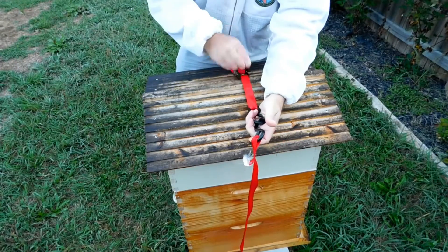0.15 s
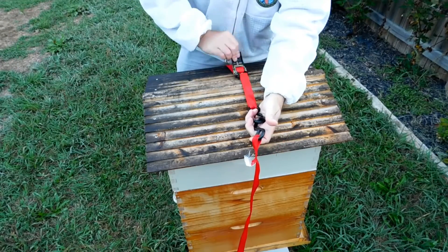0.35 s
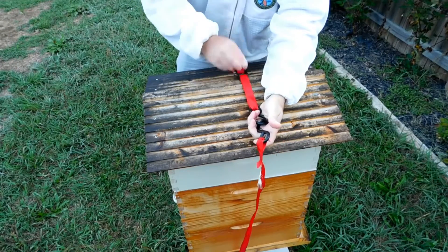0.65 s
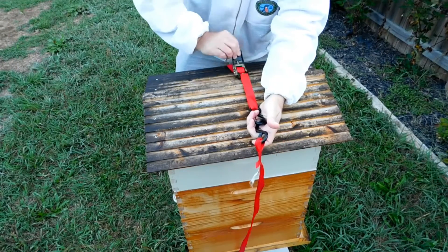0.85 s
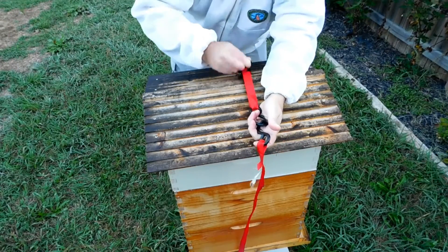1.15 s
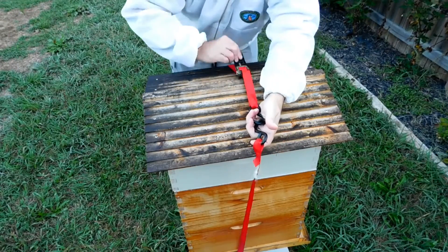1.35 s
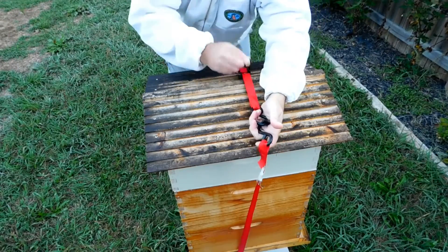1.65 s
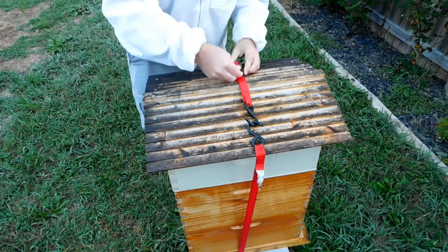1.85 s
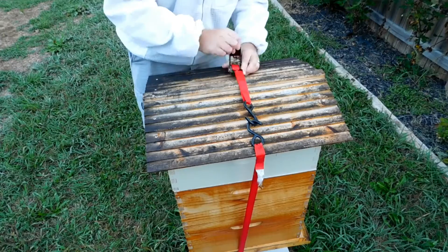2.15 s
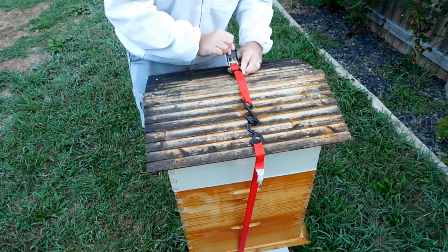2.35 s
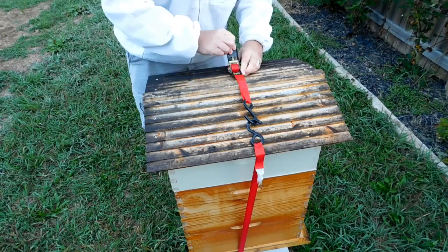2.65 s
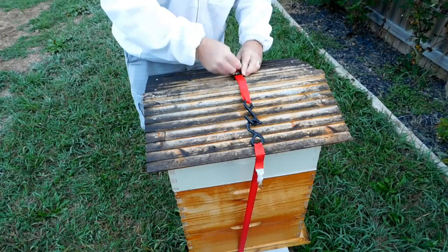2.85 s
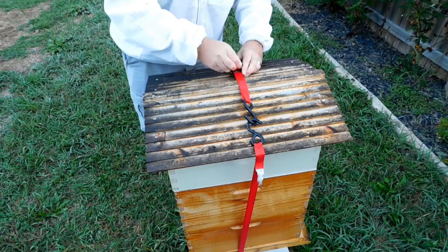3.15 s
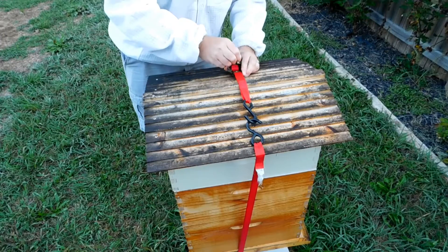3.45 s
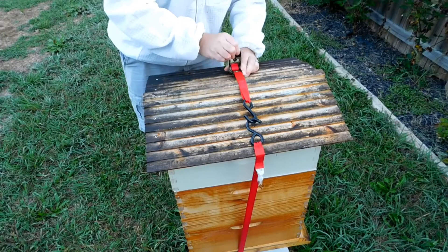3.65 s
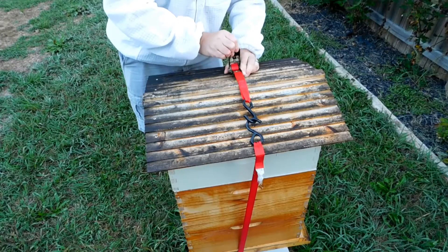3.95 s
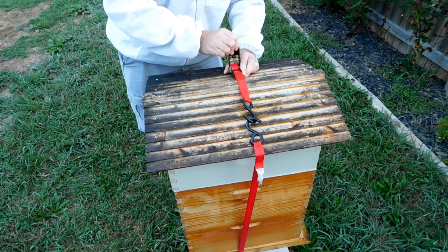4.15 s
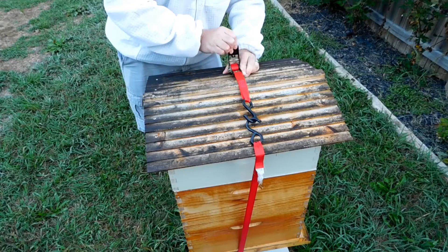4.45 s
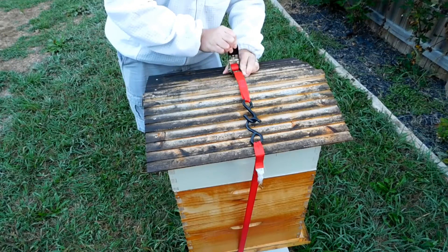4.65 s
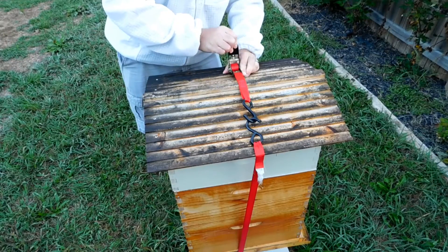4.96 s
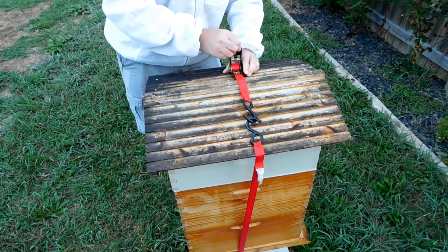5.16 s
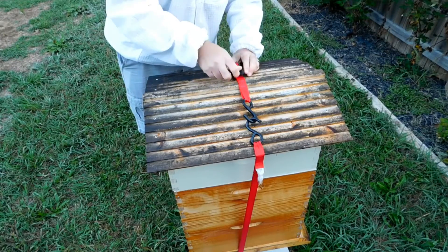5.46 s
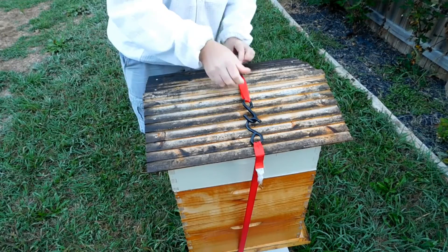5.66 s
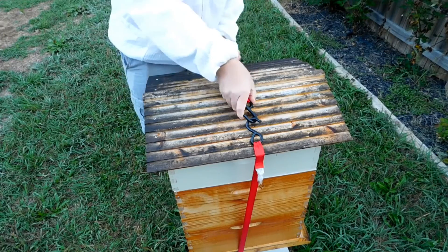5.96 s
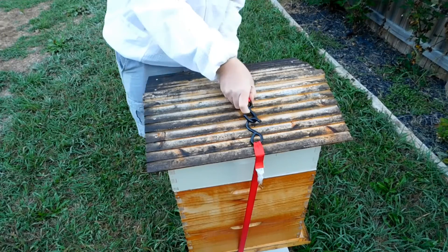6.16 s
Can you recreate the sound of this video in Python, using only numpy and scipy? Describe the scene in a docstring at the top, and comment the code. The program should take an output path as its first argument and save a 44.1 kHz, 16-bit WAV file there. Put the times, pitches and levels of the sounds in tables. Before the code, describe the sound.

A ratchet strap is tightened over a wooden beehive lid in a garden, a step from a stereo microphone and slightly to the right. From the start until about 2 seconds, sharp, dry steel clicks come in quick, uneven groups of two or three, mixed with dull knocks on the lid and soft, low booms from the hollow boxes. Between 2 and 3.3 seconds the clicks loosen and weaken into ticks and light knocks, with two stronger snaps around 2.5. Webbing and sleeves rustle faintly. Single clicks fall at 3.8 and 4.9 seconds, with a very faint, high bird whistle at 4.1. Two firm clacks follow at 5.1 and 5.4, the second with a thin, faint ring from a hook. Small wooden knocks trail off until about 6.2 seconds. The impacts have only a very short outdoor reflection, and distant road noise hisses softly throughout.

```python
"""A ratchet strap is cranked tight over the wooden lid of a beehive, a step from a stereo microphone.
The pawl snaps over the teeth and the frame knocks on the lid; each impact excites damped modes of
steel and wood. The hollow boxes boom, webbing and sleeves rustle by friction, and a free hook rings once.
A fence reflects the blows and the garden scatters them, over distant road noise and one faint bird."""
import sys
import numpy as np
from scipy import signal
from scipy.fft import rfft, irfft, next_fast_len
from scipy.io import wavfile
from scipy.ndimage import uniform_filter1d

SR = 44100
rng = np.random.default_rng(int(sys.argv[2]) if len(sys.argv) > 2 else 0)


def wav_record(signal):
    """Record a signal, one row per channel, as 16-bit PCM in the file named by sys.argv[1]."""
    frames = np.transpose(np.atleast_2d(signal))
    bounded = np.clip(frames, -1, 1)
    # unit amplitude maps onto the largest positive 16-bit level
    quanta = np.round(bounded * 32767).astype(np.int16)
    wavfile.write(sys.argv[1], SR, quanta)


N = 278712
SPAN = 4096  # samples in one blow

# The pawl snaps over a tooth: t/s, pawl level/dB, handle level/dB, lid level/dB, crack level/dB,
# favoured pawl f/Hz, favoured handle f/Hz, chatter time/ms
SNAPS = [(0.0631, -8.5, -24, -25, -11, 6000, 1700, 1.1), (0.1321, -8, -23, -18.5, -13, 6520, 1650, 0.84),
         (.1924, -16, -18, -21, -14, 5800, 2150, 1.4), (0.3488, -12, -16.5, -21.5, -11, 5930, 2040, 1),
         (.396, -9.5, -12, -19.5, -7.5, 5250, 1670, 0.79),
         (.4447, -18.5, -11, -20.5, -8.5, 5500, 1820, 1.25), (.604, -16, -17, -25, -11.5, 6100, 3340, 0.71),
         (0.6547, -8, -47, -24.5, -11.5, 6440, 1700, 0.72), (.702, -11, -38, -14.5, -28, 5900, 1740, 0.81),
         (.854, -16, -14.5, -22, -10.5, 5000, 2040, 1.4), (0.9018, -18, -17, -23.5, -8, 5280, 1710, 1.17),
         (1.1609, -14, -21, -17.5, -13, 4800, 1840, 1.22),
         (1.21, -15.5, -26.5, -24, -15.5, 6330, 1700, 1.15), (1.3764, -11.5, -11, -41, -7, 5060, 2200, 1.1),
         (1.4211, -41, -13.5, -27, -21, 5340, 2540, 2.3), (1.4272, -12.5, -13, -18, -6, 6660, 3050, 0.66),
         (1.48, -16, -16.5, -33, -17.5, 4530, 1660, 2.9), (1.6222, -14, -21.5, -33, -13.5, 7240, 1630, 1.3),
         (1.6639, -14.5, -19, -38, -13.5, 6560, 2120, 0.87), (1.711, -19, -17.5, -22, -15, 6230, 2360, 1.6),
         (1.8487, -5.5, -23, -23, -10, 5450, 1640, 0.74), (1.8801, -19, -24.5, -25.5, -19, 6460, 1920, 1.3),
         (1.957, -30, -30, -25.5, -23.5, 5840, 2900, 1.5), (2.2011, -23.5, -33, -35, -23, 5720, 1700, 0.54),
         (2.385, -45, -14.5, -48, -18.5, 5170, 2740, 3.8), (2.389, -9, -29, -23.5, -9, 6590, 3120, 0.37),
         (2.5586, -12.5, -17.5, -18.5, -9, 5100, 2850, 0.85),
         (2.823, -22.5, -43, -59, -32, 6670, 1700, 0.54), (2.9205, -23.5, -29, -31.5, -25, 7130, 1810, 1.4),
         (2.9965, -30, -49, -27, -24, 5100, 1700, 1.4), (3.8124, -18, -18.5, -27, -18, 6130, 2170, 1.02),
         (4.8974, -15.5, -17.5, -27, -9.5, 3800, 2840, 0.43),
         (5.137, -14, -8.5, -16, -23, 5470, 2190, 0.39), (5.426, -17, -15, -15.5, -7, 7120, 2450, 0.92)]


def undb(db):
    return 10 ** (np.asarray(db) / 20)


def at_rms(x, db):
    return x * undb(db) / np.sqrt(np.mean(x ** 2))


def at_peak(x, db):
    return x * undb(db) / abs(x).max()


def decay(t, t60):
    """Exponential damping: 60 dB down at t60."""
    return np.exp(-np.log(1000) * t / t60)


def band(x, lo_hz, hi_hz, order=2):
    """Butterworth band-pass."""
    sos = signal.butter(order, [lo_hz, min(hi_hz, .45 * SR)], "bandpass", fs=SR, output="sos")
    return signal.sosfilt(sos, x)


def wander(rate_hz):
    """Random steps smoothed twice; spread near 1."""
    k = int(SR / rate_hz)
    steps = np.repeat(rng.standard_normal(N // k + 1), k)
    return 1.43 * uniform_filter1d(uniform_filter1d(steps, k), k)[:N]


def delay(x, lag_s):
    """A linear phase shift delays by any fraction of a sample."""
    size = next_fast_len(N + SPAN)
    shift = np.exp(-2j * np.pi * np.fft.rfftfreq(size, 1 / SR) * lag_s)
    return irfft(rfft(x, size) * shift, size)[:N]


def road(db):
    """Distant tyre noise in flickering half-octave bands; coherence between channels falls with frequency."""
    # Tyre noise spectrum: f/Hz, relative spectral density level/dB
    spectrum = [(30, -20.5), (62, -9.5), (110, -22.5), (200, -12.5), (400, -10.5), (800, 2.5), (1250, 0.5),
                (2000, -14), (3200, -17), (6300, -26.5), (12000, -33), (16500, -46)]
    freqs, density_db = np.transpose(spectrum)
    out = 0
    for hz in 35 * 2 ** np.arange(0, 9, .5):
        mid, side = band(rng.standard_normal((2, N)), hz * 2 ** -.25, hz * 2 ** .22)
        coherence = np.clip(1.05 - .52 * np.log2(1 + hz / 900), 0, .95)
        pair = np.sqrt(1 + coherence) * mid + np.sqrt(1 - coherence) * side * np.array([[1], [-1]])
        band_db = np.interp(np.log(hz), np.log(freqs), density_db) + wander(rate_hz=4.84)
        out = out + undb(band_db) * pair
    return at_rms(out, 0) * undb(db)


def bird():
    """Thin far-off whistles: pure tones that waver by random frequency modulation."""
    # Whistles: t/s, duration/s, f/Hz, level/dB
    whistles = [(4.1, .08, 7540, -61), (4.12, 0.077, 6950, -66), (4.17, 0.044, 8100, -66)]
    t, out = np.arange(N) / SR, 0
    for start, length, hz, db in whistles:
        phase = 2 * np.pi * np.cumsum(hz * (1 + .03 * wander(rate_hz=400))) / SR
        envelope = np.sin(np.pi * np.clip((t - start) / length, 0, 1))
        out = out + undb(db) * envelope * np.sin(phase)
    return out


def garden(x, t60_s=.24, gain_db=-21.5):
    """Scattering from grass, boxes and boards leaves a short dull tail, different in each channel."""
    t = np.arange(SR // 3) / SR
    tails = rng.standard_normal((2, len(t))) * decay(t, t60_s) * np.minimum(t / .001, 1)
    tails = band(tails, 440, 5600, order=1)
    return undb(gain_db) * np.array([signal.fftconvolve(x, h / np.linalg.norm(h))[:N] for h in tails])


def fence(x, lag_s=.011, smear_s=.0005, gain_db=-12.5):
    """Reflection from uneven boards: one echo, smeared differently in each channel."""
    t = np.arange(256) / SR
    boards = rng.standard_normal((2, len(t))) * np.exp(-t / smear_s)
    echo = delay(band(x, 300, 14600, order=1), lag_s)
    return undb(gain_db) * np.array([np.convolve(echo, h / np.linalg.norm(h))[:N] for h in boards])


def rustle(db):
    """Friction of webbing and sleeves makes dense, uneven grains of noise."""
    grains = rng.standard_normal(N) * undb(2.5 * rng.exponential(size=N) + 2.5 * wander(rate_hz=20))
    return at_rms(band(grains, 2200, 7000, order=1), 0) * undb(db)


def thumps(re_crack_db=-26, width_s=.0012, tight_s=3.0, tight_db=-9):
    """Shock excitation: a snap jolts each capsule with its own low pulse, weaker once the strap is tight."""
    out, offsets = np.zeros((2, N)), np.arange(-256, 256)
    pulse = np.exp(-.5 * (offsets / SR / width_s) ** 2)
    for (start, _, _, _, crack_db, *_), jolt in zip(SNAPS, rng.standard_normal((len(SNAPS), 2, 1))):
        db = crack_db + re_crack_db + tight_db * (start > tight_s)
        out[:, int((start + .002) * SR) + offsets] += jolt * undb(db) * pulse
    return out


def hive(mode_hz=98.3, rise_s=.006, t60_s=.15):
    """Resonance: one low mode of the hollow boxes is pushed softly as a pull stroke bottoms out."""
    # Booms: t/s, level/dB
    booms = [(0.227, -35), (.705, -40), (0.744, -47), (1.161, -44), (1.245, -47), (1.492, -45),
             (1.752, -41), (1.798, -39.5)]
    out, t = np.zeros(N), np.arange(SR // 3) / SR
    boom = (1 - np.exp(-t / rise_s)) * decay(t, t60_s) * np.sin(2 * np.pi * mode_hz * t)
    for start, db in booms:
        i = int(start * SR)
        out[i:i + len(t)] += undb(db) * boom
    return out


def hook(start_s=5.428, centre_hz=13300, t60_s=.3, mode_db=-62):
    """Free vibration of a hook: thin, closely spaced modes beat as they decay."""
    t = np.maximum(np.arange(int((start_s + .5) * SR)) / SR - start_s, 0)
    hz = centre_hz * (1 + .016 * rng.standard_normal(30))
    tones = np.sin(2 * np.pi * (np.outer(hz, t) + rng.random((30, 1))))
    ringing = undb(mode_db) * tones.sum(axis=0) * decay(t, t60_s) * (t > 0)
    return np.pad(ringing, (0, N - len(t)))


def ring(force, modes, chance, peak_db, favoured_hz, focus_db, scatter_db=3, detune=.038):
    """Modal superposition: a force drives damped modes whose level and tuning vary from blow to blow."""
    t = np.arange(SPAN) / SR
    hz, t60 = np.transpose(modes)
    db = scatter_db * chance[:len(hz), 0]
    hz = hz * (1 + detune * chance[:len(hz), 1])
    if .85 * hz.min() < favoured_hz < 1.15 * hz.max():  # the grip favours one mode
        nearest = np.argmin(abs(np.log(hz / favoured_hz)))
        hz[nearest], db[nearest] = favoured_hz, focus_db
    response = undb(db) @ (np.sin(2 * np.pi * np.outer(hz, t)) * decay(t, t60[:, None]))
    return at_peak(signal.fftconvolve(force, response)[:SPAN], peak_db)


def blows(handle_hz=1836, lid_hz=855, knock_ms=.76, tick_ms=.86):
    """All impacts, in the columns of SNAPS with the favoured lid f/Hz added before the chatter time."""
    # The frame knocks on the lid: t/s, lid level/dB, handle level/dB, pawl level/dB, favoured lid f/Hz
    knocks = [(0.2339, -13, -20.5, -27, 845), (.539, -15.5, -32, -24, 896), (0.7108, -18, -21, -40, 940),
              (1.0379, -19.5, -44, -52, 503), (1.2455, -18.5, -31, -49, 885),
              (1.5622, -15, -15.5, -25, 836), (1.7481, -12.5, -15.5, -48, 900),
              (2.1557, -13.5, -22, -39, 734), (2.2453, -27.5, -25.5, -28.5, 1030),
              (2.5726, -18, -54, -41, 706), (2.7723, -21.5, -22.5, -31.5, 650),
              (2.8158, -20, -53, -30, 695), (3.067, -27.5, -55, -34, 693), (3.0918, -25, -38, -47, 504),
              (3.1859, -27, -57, -60, 700), (3.2155, -26, -38, -31.5, 980),
              (5.1523, -23.5, -22.5, -37, 447), (5.3373, -29, -56, -40, 710), (5.5237, -22, -29, -29, 1003),
              (5.547, -27.5, -52, -41, 853), (5.6808, -44, -30.5, -29, 1160), (5.688, -24.5, -39, -41, 590),
              (5.9037, -24, -56, -41.5, 553), (6.2088, -32.5, -36, -47, 790)]
    # Loose steel ticks, often the pawl slipping just before a snap:
    # t/s, pawl level/dB, handle level/dB, crack level/dB
    ticks = [(.0574, -52, -33, -50), (.0968, -43, -30, -35), (.3103, -38, -23, -34), (.34, -37, -26, -48),
             (.3902, -27, -21.5, -31), (.4364, -33, -22, -21), (.5976, -21, -30, -17),
             (.6275, -29, -25.5, -28), (.8447, -20, -27, -23), (0.8927, -16, -25, -33),
             (.967, -27, -24.5, -35), (1.0726, -25.5, -50, -34.5), (1.1225, -29, -24, -35),
             (1.3115, -40, -26.5, -38), (1.3677, -23, -20, -26.5), (1.7844, -28.5, -26.5, -27),
             (1.985, -43, -30, -31), (2.186, -33, -49, -32), (2.3734, -24.5, -31, -36),
             (2.8617, -35, -37, -33.5), (2.941, -45, -38, -32), (2.963, -39, -40, -38),
             (2.99, -38, -41, -38), (3.0743, -48, -24.5, -24), (3.262, -38, -49, -54),
             (3.8788, -34.5, -27, -45), (4.4926, -49, -43, -43), (4.7192, -44, -50, -59),
             (5.3174, -43, -38, -53), (5.3473, -43, -42, -35), (5.4988, -44, -33, -47)]

    def idle_pawl_hz():
        return 4960 * np.exp(.09 * np.clip(rng.standard_normal(), -1.4, 2))

    rows = [(*snap, lid_hz, ms) for *snap, ms in SNAPS]
    rows += [(start, pawl_db, handle_db, lid_db, pawl_db - 7, idle_pawl_hz(), handle_hz, hz, knock_ms)
             for start, lid_db, handle_db, pawl_db, hz in knocks]
    rows += [(start, pawl_db, handle_db, handle_db - 6.5, crack_db,
              idle_pawl_hz(), handle_hz, lid_hz, tick_ms)
             for start, pawl_db, handle_db, crack_db in ticks]
    return rows


def ratchet():
    """Impact excitation: chattering contacts ring the steel; the lid takes one push and a dull rattle."""
    # Modes of each part, damped by the gripping hand: f/Hz, T60/s
    pawl_modes = [(4300, .006), (4800, .006), (5330, .009), (6250, .009), (7260, .006), (7900, .006)]
    handle_modes = [(1620, .022), (1800, .018), (2100, .01), (2480, .01), (2700, .01), (3130, .012),
                    (3600, .008)]
    spring_modes = [(9200, .012), (10300, .006), (11000, .008), (11900, .008), (13100, .006), (14300, .006)]
    lid_modes = [(310, .025), (400, .03), (490, .035), (650, .035), (850, .035), (980, .03), (1200, .02)]
    lead = 512  # samples ahead of the contact
    out, t, rows = np.zeros(N + SPAN), (np.arange(SPAN) - lead) / SR, blows()
    noises = rng.standard_normal((len(rows), 3, SPAN))
    chances = rng.standard_normal((len(rows), 4, 8, 2))

    def pulse(decay_s):
        return (t >= 0) * np.exp(-abs(t) / decay_s)

    contact = pulse(.00007)
    for row, (hiss, rub, grit), chance in zip(rows, noises, chances):
        start, pawl_db, handle_db, lid_db, crack_db, pawl_hz, handle_hz, lid_hz, chatter_ms = row
        slip = np.clip((t - .0015) / (max(chatter_ms, .1) / 1000), -50, 50)
        swell = 1 / (np.exp(-slip) + np.exp(slip / 1.81))  # contacts build as the tooth slips, then die
        chatter = hiss * swell
        rattle = rub * pulse(.015)
        dense_modes = grit * (swell + .12 * pulse(.009))  # crowded modes merge into noise
        blow = ring(chatter, pawl_modes, chance[0], pawl_db, pawl_hz, focus_db=12)
        blow += at_peak(band(dense_modes, 1.023 * pawl_hz, 1.126 * pawl_hz), pawl_db - 9.5)
        blow += ring(chatter + contact, handle_modes, chance[1], handle_db, handle_hz, focus_db=9)
        blow += at_peak(band(dense_modes + 1.5 * contact, 1500, 3500), handle_db - 6)
        blow += ring(chatter, spring_modes, chance[2], crack_db - 9, favoured_hz=9200, focus_db=5)
        blow += at_peak(band(grit * swell, 5530, 14460, order=3), crack_db)
        blow -= ring(contact + .16 * rattle, lid_modes, chance[3], lid_db, lid_hz, focus_db=9)
        blow -= at_peak(band(contact + .23 * rattle, 309, 1047), lid_db - 2.5)
        i = int(start * SR) - lead
        out[i:i + SPAN] += blow
    return band(out[:N], 178, 20000, order=3)  # a small lid radiates little bass


def scene(left_lag_s=2.1e-5, left_db=-1.9, road_left_db=-.8):
    """Superposition of direct sound, echoes and background; time and level cues set the strap to the right."""
    # Course of the continuous noises: t/s, road level/dB, rustle level/dB
    noise_levels = [(0, -37.5, -89), (.5, -38, -63), (1.0, -38.5, -54), (1.5, -39, -65), (1.85, -38, -72),
                    (2.0, -42.5, -58.5), (2.35, -43, -59), (2.45, -40.5, -54.5), (2.7, -44.5, -60.5),
                    (3.3, -44, -66), (4.1, -44, -73), (4.45, -44.5, -67), (4.8, -44.5, -73),
                    (5.5, -43, -69), (6.32, -44.5, -61.5)]
    times, *columns = np.transpose(noise_levels)
    road_db, rustle_db = (np.interp(np.arange(N) / SR, times, db) for db in columns)
    hits = ratchet() + hook()
    near = hits + hive() + rustle(rustle_db)
    direct = np.array([undb(left_db / 2) * delay(near, left_lag_s), undb(-left_db / 2) * near])
    road_balance = undb(np.array([[.5], [-.5]]) * road_left_db)
    return direct + fence(hits) + garden(hits) + thumps() + road_balance * road(road_db) + bird()


def record(dry, cutoff_hz=15700):
    """Saturation in the capsules rounds loud peaks; a steep low-pass cuts the top."""
    soft = np.tanh(1.319 * dry) / 1.467
    return signal.sosfilt(signal.ellip(8, .2, 70, cutoff_hz, fs=SR, output="sos"), soft)


dry = scene()
out = record(dry)
wav_record(out)
```